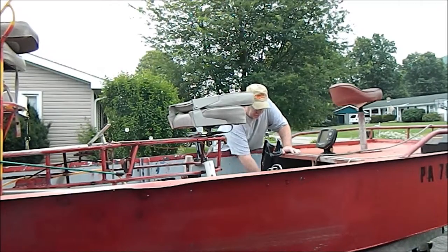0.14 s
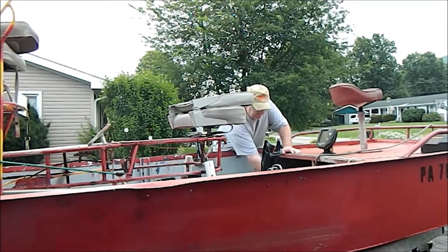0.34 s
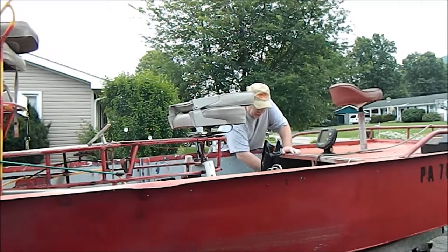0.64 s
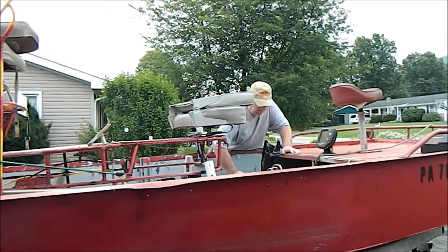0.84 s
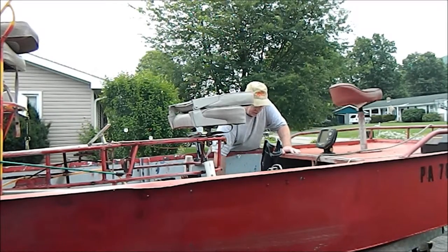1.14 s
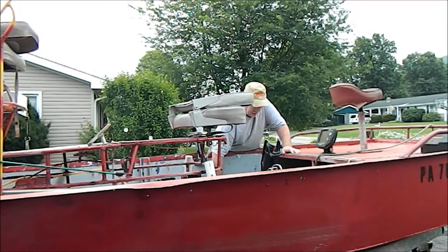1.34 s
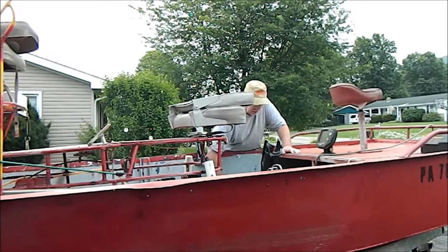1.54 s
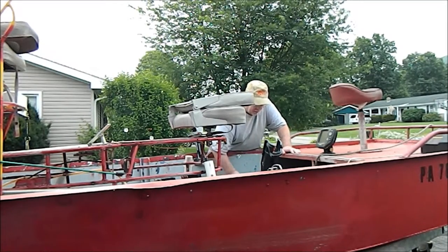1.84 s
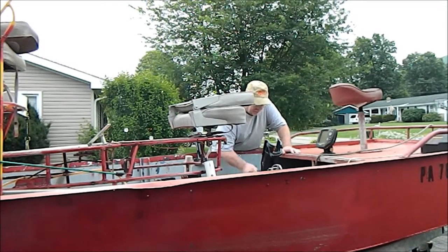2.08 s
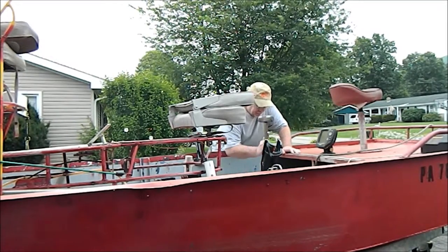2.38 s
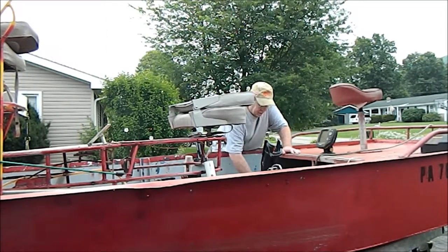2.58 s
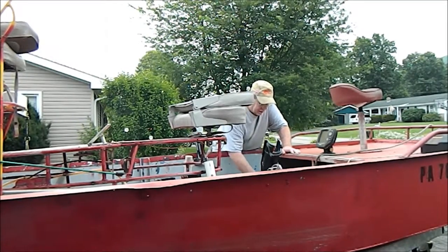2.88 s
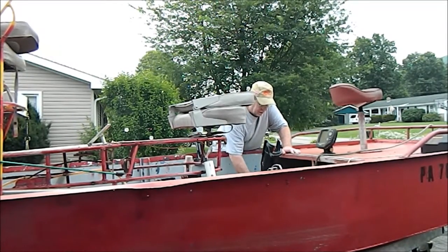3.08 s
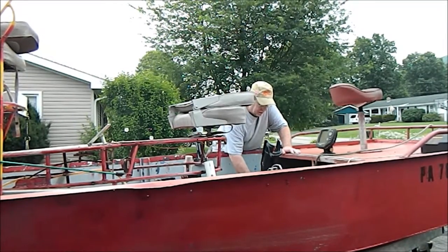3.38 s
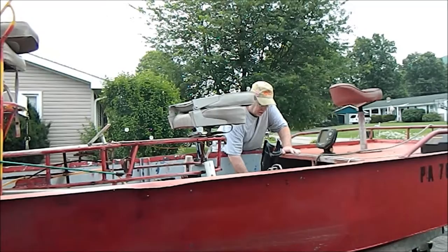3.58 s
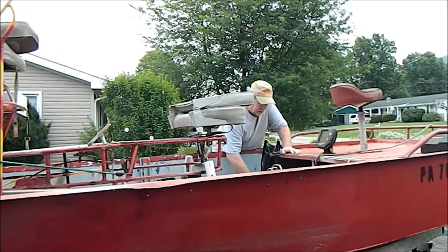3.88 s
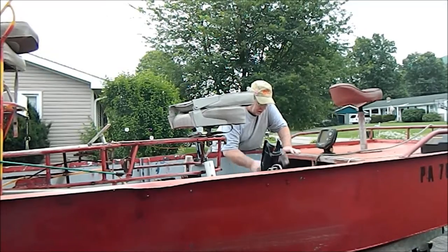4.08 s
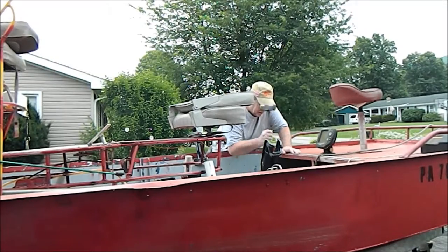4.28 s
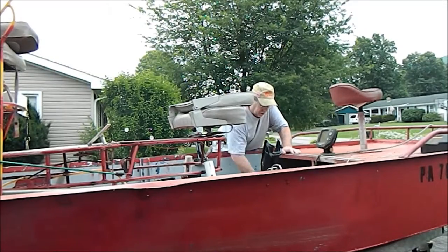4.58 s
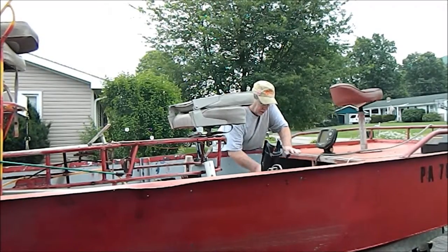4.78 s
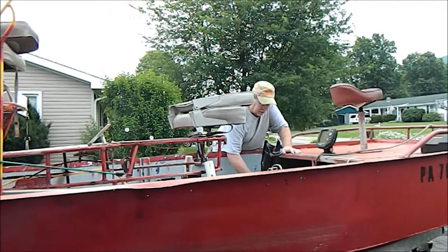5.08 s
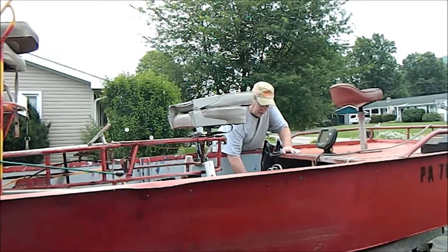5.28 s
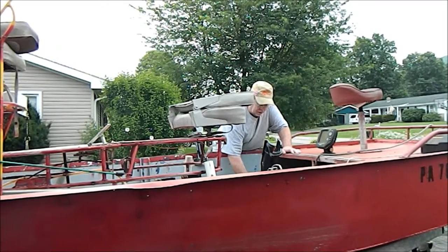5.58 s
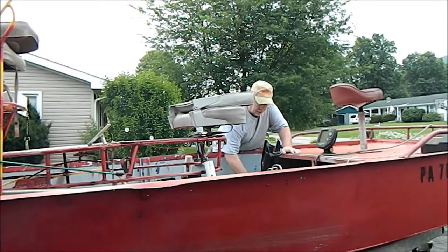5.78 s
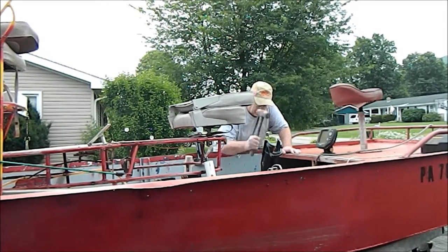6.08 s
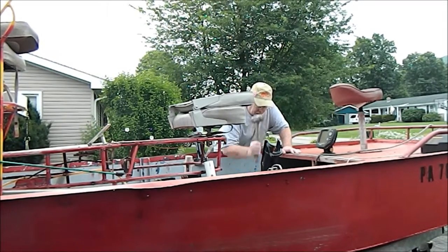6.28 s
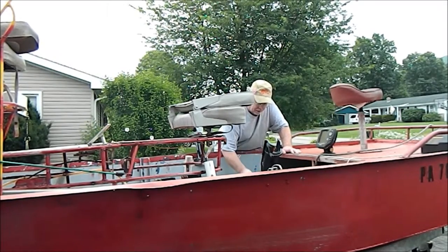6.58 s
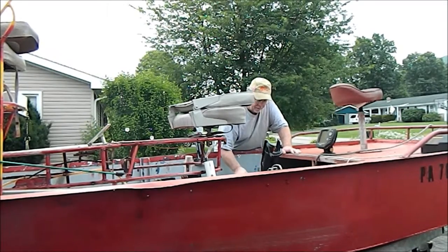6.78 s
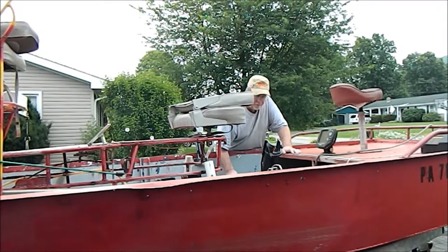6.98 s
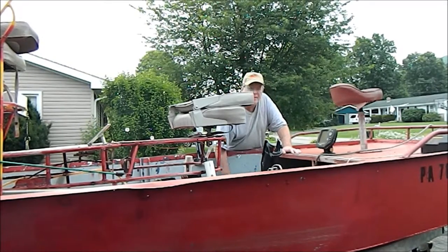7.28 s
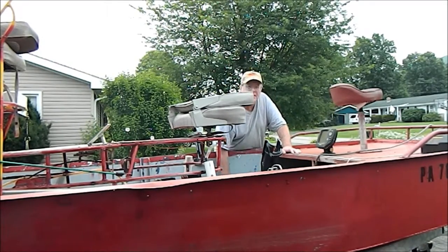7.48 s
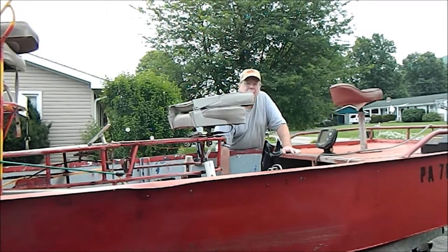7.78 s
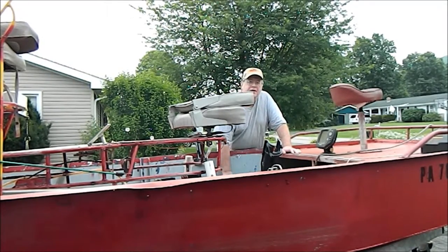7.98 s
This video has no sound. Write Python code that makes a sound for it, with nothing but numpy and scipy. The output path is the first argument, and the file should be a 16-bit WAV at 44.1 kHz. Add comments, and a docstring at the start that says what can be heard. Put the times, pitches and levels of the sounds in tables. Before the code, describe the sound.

Outdoors in a garden, light gusts bump the microphone while a quick chirping bird and a lower whistling bird sing. Weak muffled knocks on a metal hull come first, then loud hollow bangs from about 2.6 seconds, with rapid bounces, small ticks of loose fittings and thin steel ringing. Birdsong mostly stops as the hammering takes over. Stereo microphone a few metres away.

```python
"""A garden with a sheet-metal boat hull a few metres from a stereo pair of microphones.
From the start, gusts bump the microphones over a suburban background, and two songbirds call from the trees.
A hammer soon knocks and bounces on the inside of the hull, to the end: panel modes, dense plate noise and cracks.
From about three seconds loose fittings tick between blows and thin steel tones linger.
The birds are sliding near-sines with echoes; the background is band noise whose level sinks and returns."""
import sys
import numpy as np
from scipy import signal
from scipy.io import wavfile
from scipy.ndimage import uniform_filter1d

SR = 44100
rng = np.random.default_rng(int(sys.argv[2]) if len(sys.argv) > 2 else 0)


def persist_wave(psi):
    """Save psi, clipped to +-1, as 16-bit WAV."""
    counts = np.round(np.clip(psi, -1, 1) * 32767).astype(np.int16)
    wavfile.write(sys.argv[1], SR, np.atleast_2d(counts).T)


N = 358884
STEP = 8  # samples between points of an energy envelope
BANDS_HZ = 45 * 2 ** np.arange(0, 8.6, .5)  # band centres
RISE_S = 0.0036  # part of the rise of the hull that is the same at every pitch
LEFT_RIGHT = np.array([[.5], [-.5]])  # shares out a left-minus-right level difference

# hammer blows and their bounces on the sheet:
# (time [s], level [dB], bass [dB], middle [dB], treble [dB], main panel pitch [Hz])
HAMMER_BLOWS = [(.375, -37, -29, -4, -33, 424), (.743, -14, -32, -17, -39, 390),
                (1.269, -23.5, -27, -28, -29, 360.6), (2.645, -2.5, -21, -14, -18.5, 371),
                (2.671, -18.5, -8, -10, -44, 396.3), (3.124, -13, -15, -11, -15.5, 379.6),
                (3.364, -12.5, -15, -12, -18, 382.3), (3.518, -13.5, -12.5, -12, -21, 382.7),
                (3.601, -15, -17.5, -12.5, -20.5, 381.4), (3.654, -16.5, -16.5, -15.5, -23, 393.4),
                (3.689, -25.5, -16, -16, -26, 376), (4.633, -4, -17, -13.5, -17.5, 380.8),
                (5.302, -25, -15.5, -14.5, -26.5, 379), (5.329, -32.5, -23, -39, -15.5, 420),
                (5.494, -21.5, -17, -10, -18.5, 374.3), (5.518, -25, -17, -25, -20, 399),
                (5.578, -22.5, -16, -12, -23, 376.5), (5.639, -29, -11.5, -14.5, -24.5, 380.7),
                (6.504, -13.5, -19.5, -4, -7, 386), (6.513, -4.5, -14.5, -13, -34, 397.2),
                (7.466, -15, -18, -14.5, -23.5, 384.2), (7.498, -17, -28, -45, -45, 390),
                (7.573, -23.5, -9.5, -18, -38, 419), (7.718, -2, -25.5, -17.5, -33, 399.4),
                (7.792, -10.5, -17, -12, -26, 397.6), (7.812, -7.5, -45, -39, -54, 403),
                (7.859, -16.5, -15, -60, -56, 381), (8.077, -10, -20, -19, -43, 372),
                (8.1, -5.5, -40, -38, -40.5, 373)]


def undb(db):
    """Gain of a level in dB."""
    return np.exp(np.asarray(db) * np.log(10) / 20)


def unit(x):
    """Scale to rms 1."""
    return x / np.sqrt(np.mean(x ** 2))


def spectrum(table, hz):
    """Read (frequency [Hz], value) points on a log frequency axis."""
    points = np.array(table)
    return np.interp(np.log(hz), np.log(points[:, 0]), points[:, 1])


def curve(table, axis):
    """One column of a table over time, at envelope rate."""
    points = np.array(table)
    return np.interp(np.arange(0, N, STEP) / SR, points[:, 0], points[:, axis])


def walk(rate):
    """Random levels held 1 / rate seconds and smoothed twice over that time."""
    hold = int(SR / rate)
    steps = np.repeat(rng.standard_normal(N // hold + 1), hold)
    return 1.36 * uniform_filter1d(uniform_filter1d(steps, hold), hold)[:N]


def add(track, s, x, size=1):
    """Mix x into a track with points size samples apart, from time s."""
    i = int(s * SR / size)
    track[..., i:i + x.shape[-1]] += x[..., :track.shape[-1] - i]


def fade(t60, rise_s, size=1):
    """Rise, then exponential fall down to -60 dB, at points size samples apart."""
    t = np.arange(0, int(t60 * SR), size) / SR
    return (1 - np.exp(-t / max(rise_s, 1e-4))) * undb(-60 * t / t60)


def band_noise(hz):
    """Half-octave stereo noise, as alike and as balanced as the two microphones hear it."""
    # likeness of the two microphones: (frequency [Hz], correlation [0-1])
    likeness = [(60, 0.01), (130, 0.86), (290, 0.88), (640, 0.9), (1410, 0.75), (3100, 0.66), (6820, 0.25),
                (15000, 0.31)]
    # balance of the two microphones: (frequency [Hz], left minus right [dB])
    balance = [(60, -1), (110, -5.5), (200, -0.5), (380, -3), (700, -1), (1290, -0.5), (2380, -0.5),
               (4400, 2), (8120, 3.5), (15000, -1)]
    edges = [hz / 2 ** .25, hz * 2 ** .25]
    band = signal.butter(3, edges, "band", fs=SR, output="sos")
    mid, side = signal.sosfilt(band, rng.standard_normal((2, N)))
    alike = np.clip(spectrum(likeness, hz), 0, 1)
    shared = np.sqrt(1 + alike) * unit(mid)
    opposed = np.sqrt(1 - alike) * unit(side) * np.array([[1], [-1]])
    return (shared + opposed) * undb(spectrum(balance, hz) * LEFT_RIGHT) / np.sqrt(2)


def wind_db(far_db):
    """Wind pressure on the microphones: a breeze that goes with the background, and gusts that swell and fall."""
    # gusts: (time of the peak [s], level [dB], length [s])
    gusts = [(0, -23.5, 0.068), (.13, -25.5, 0.029), (0.197, -35, 0.11), (0.363, -39, 0.12),
             (0.503, -40, .1), (0.604, -30, 0.049), (0.75, -36.5, 0.082), (0.968, -40, 0.047),
             (1.515, -35, 0.11), (1.706, -43.5, 0.23), (2.115, -42.5, 0.066), (2.214, -31.5, 0.063),
             (2.651, -25, 0.067), (3.803, -38.5, 0.23)]
    breeze_db = 1  # over the background level
    t = np.arange(0, N, STEP) / SR
    power = undb(2 * (far_db + breeze_db))
    for s, db, length in gusts:
        power = power + undb(2 * db) * np.exp(-(3 * (t - s) / length) ** 2)
    return 10 * np.log10(power)


def air_power(hz, far_db, leaves_db, gust_db):
    """Energy of distant traffic, high leaf hiss and low wind in one band; each traffic band flickers alone."""
    # distant suburb: (frequency [Hz], relative level [dB per Hz])
    suburb = [(24, -55), (40, -36), (91, -4), (156, -9), (248, -15), (623, -12), (678, -20.5), (890, -20),
              (3270, -26), (6000, -42.5), (7800, -75), (13200, -120)]
    leaf_colour = [(1500, -4), (4000, 2), (8000, -3.5), (12000, -3.5), (16000, -26.5)]
    gust_colour = [(45, -24.5), (110, 1), (200, -19.5), (450, -24.0), (900, -36.0)]
    far_db = far_db + spectrum(suburb, hz) + 10 * np.log10(hz) - 13.0  # level per Hz to level per band
    leaves_db = leaves_db + spectrum(leaf_colour, hz)
    gust_db = gust_db + spectrum(gust_colour, hz)
    traffic = undb(2 * far_db + 3.64 * walk(10)[::STEP])
    return traffic + undb(2 * leaves_db) + undb(2 * gust_db)


def bird(notes, overtone_db):
    """Near sines that bend through three pitches, swell and fade; burr shakes pitch and level."""
    swell_share, fade_share = 0.24, 0.08  # parts of a note
    out, shake = np.zeros(N), walk(180)
    for s, length, start_hz, middle_hz, end_hz, db, burr in notes:
        i = np.arange(int(s * SR), int((s + length) * SR))
        u = np.linspace(-1, 1, len(i))  # start to end of the note
        slide = u * (end_hz - start_hz) / 2
        bend = u ** 2 * ((start_hz + end_hz) / 2 - middle_hz)
        hz = middle_hz + slide + bend
        phase = 2 * np.pi * np.cumsum(hz * (1 + 0.076 * burr * shake[i])) / SR
        swell = np.minimum(np.minimum((1 + u) / swell_share, (1 - u) / fade_share) / 2, 1)
        size = np.sqrt(2) * undb(db) * (1 + 0.17 * burr * shake[i]) * swell
        out[i] += size * (np.sin(phase) + undb(overtone_db) * np.sin(2 * phase))
    return out


def finch_song():
    """Quick chirps, nearly pure, each bent and slightly burred."""
    # chirps: (time [s], length [s], start pitch [Hz], middle pitch [Hz], end pitch [Hz], level [dB])
    chirps = [(0, 0.0089, 2970, 3340, 3940, -36), (0.102, 0.063, 4000, 4200, 4470, -45.5),
              (0.115, 0.028, 3790, 3500, 3000, -43.5), (0.139, 0.029, 3160, 3820, 3910, -35.5),
              (0.227, 0.028, 3970, 3700, 3080, -35.5), (0.269, 0.023, 5150, 5160, 5100, -47),
              (.29, 0.022, 5240, 4600, 4000, -33), (0.428, 0.029, 2870, 3290, 3520, -31.5),
              (0.502, 0.013, 3950, 4250, 4530, -48), (0.507, 0.026, 4100, 3830, 3060, -33.5),
              (0.599, .03, 2960, 3340, 3820, -43.5), (0.62, 0.019, 3800, 3900, 3850, -37.5),
              (0.609, .022, 2610, 3300, 4300, -39), (0.713, 0.044, 5100, 5020, 5140, -44.5),
              (0.723, 0.046, 4750, 4240, 4520, -41.5), (0.747, 0.022, 5130, 4500, 3800, -35),
              (.817, 0.032, 4170, 3690, 2840, -32.5), (0.847, 0.057, 2900, 3860, 3880, -42),
              (0.957, 0.045, 2760, 3020, 2300, -35.5), (1.018, 0.028, 2350, 3660, 2500, -37),
              (1.122, 0.028, 3000, 2485, 3600, -38), (1.16, 0.03, 3720, 3500, 2300, -36.5),
              (1.237, 0.018, 3800, 4500, 5500, -42), (1.242, 0.027, 3200, 3830, 3730, -42),
              (1.257, 0.014, 5700, 4600, 3530, -40), (1.447, 0.074, 3400, 3490, 3490, -46.5),
              (1.97, 0.034, 4840, 4210, 3150, -53), (2.012, 0.072, 3170, 3810, 4180, -45.5),
              (2.032, 0.039, 7000, 6300, 5900, -52.5), (2.064, 0.015, 4250, 3380, 2900, -38),
              (2.068, .035, 7050, 7030, 6260, -53), (2.076, 0.047, 4200, 4230, 4260, -49),
              (2.078, 0.029, 2960, 2850, 2770, -38.5), (2.183, 0.042, 3330, 3250, 3290, -42.5),
              (2.228, .022, 3700, 4870, 5700, -51), (2.315, .03, 4750, 4200, 3700, -58),
              (2.342, 0.013, 3700, 5030, 6250, -50), (2.4, 0.053, 3680, 3770, 3420, -56),
              (2.466, 0.026, 2950, 3710, 4650, -39), (2.478, 0.037, 4380, 5170, 4830, -47),
              (2.487, 0.028, 4900, 4520, 3540, -39), (2.513, 0.016, 3500, 3560, 3550, -35.5),
              (2.527, 0.038, 3200, 3500, 3870, -35), (2.563, .035, 3730, 3760, 3700, -44.5),
              (2.566, 0.044, 3100, 3190, 3300, -44)]
    burr = .15
    return bird([(*row, burr) for row in chirps], overtone_db=-35)


def trill():
    """A whistle whose pitch swings evenly up and down, at the end of one thrush phrase."""
    start_s, length_s, level_db = 1.74, 0.078, -30
    middle_hz, swing_hz, period_s = 2290, 280, .025
    out, t = np.zeros(N), np.arange(int(length_s * SR)) / SR
    hz = middle_hz + swing_hz * np.cos(2 * np.pi * (t + 0.0074) / period_s)
    whistle = np.sin(2 * np.pi * np.cumsum(hz) / SR)
    add(out, start_s, np.sqrt(2) * undb(level_db) * signal.windows.tukey(len(t), .3) * whistle)
    return out


def thrush_song():
    """Mostly lower whistled notes, each bent and burred in its own way, with one trill."""
    # notes: (time [s], length [s], start pitch [Hz], middle pitch [Hz], end pitch [Hz], level [dB],
    # burr [relative, 0-3])
    whistles = [(0, 0.013, 2470, 2415, 2340, -32, 0.68), (.25, 0.036, 2310, 2197, 2140, -45.5, .25),
                (.287, 0.041, 3260, 3206, 3180, -30.5, 0.27), (.327, 0.045, 2190, 2190, 1974, -33, 0.15),
                (.377, 0.042, 2420, 2670, 2870, -30, 0.12), (.422, 0.043, 2330, 2460, 2620, -31.5, .2),
                (.464, 0.039, 2126, 2400, 2430, -33.5, .25), (.79, 0.081, 2430, 2372, 2374, -25.5, 0.067),
                (.872, 0.016, 2270, 2116, 1840, -29.5, 0.34), (.886, 0.058, 1840, 1898, 2030, -34.5, .25),
                (.94, 0.069, 2300, 2226, 2087, -29, 0.087), (.9, 0.14, 4670, 4500, 4410, -51, .85),
                (1.237, 0.031, 1960, 2216, 2170, -40.5, 0.17), (1.27, 0.04, 3250, 3115, 2670, -25.5, 0.36),
                (1.314, .038, 2550, 2500, 2380, -28, 0.6), (1.354, 0.0287, 2180, 2183, 2150, -24.5, 0.14),
                (1.6, 0.092, 2517, 2643, 2750, -33.5, 0.31), (1.662, 0.026, 2810, 2980, 2880, -25.5, 0.46),
                (1.687, 0.045, 2780, 2413, 2480, -24.5, 0.15), (2.11, 0.092, 2900, 2450, 2660, -46, 2.45),
                (4.39, 0.093, 2620, 2815, 2830, -51.5, 0.091), (4.48, 0.1, 3270, 3070, 3030, -55, .45),
                (4.497, 0.054, 2710, 2480, 2400, -50.5, .2), (4.545, .07, 2420, 2700, 2720, -46, 0.21)]
    return bird(whistles, overtone_db=-40.5) + trill()


def garden(x, wet_db, t60):
    """A few clear wall echoes with a scattered tail from the trees, unlike left and right."""
    # house walls: (delay [s], left level [dB], right level [dB])
    wall_echoes = [(.009, -9.5, -5.5), (0.018, -13.5, -8.5), (.031, -19, -19)]
    tail = rng.standard_normal((2, int(t60 * SR))) * fade(t60, 0.004)
    tail = undb(wet_db) * tail / np.sqrt(np.sum(tail[0] ** 2))
    for s, left_db, right_db in wall_echoes:
        add(tail, s, undb([[left_db], [right_db]]))
    return signal.fftconvolve(x[None], tail, axes=1)[:, :N]


def fittings_power(hz):
    """Energy of loose fittings in one band: short ticks of small parts, which radiate little bass."""
    # ticks: (time [s], level [dB], darkness above 2500 Hz [dB per octave])
    fitting_ticks = [(2.879, -28, -0.5), (3.8177, -36.5, -4), (3.8971, -44.5, 3.5), (4.0326, -43.5, 2.5),
                     (4.1969, -49, 5.5), (4.3789, -46.5, 5), (4.9314, -46.5, 3), (4.9856, -38.5, -1.5),
                     (5.0753, -34.5, 3), (5.166, -31, -1), (5.6994, -52, -5), (5.7465, -50, 1),
                     (5.833, -50, 4), (5.8696, -47.5, 5), (5.916, -44.5, 2), (5.996, -44, 3),
                     (6.0294, -49, 10), (6.0811, -43.5, 3.5), (6.1737, -43, 2), (6.2163, -47, 4),
                     (6.28, -43.5, 1), (6.399, -42.5, 2.5), (6.452, -42, 6), (6.7574, -43, 6),
                     (6.808, -40.5, 1), (6.9274, -51.5, 3)]
    power = np.zeros((2, len(range(0, N, STEP))))
    small = hz ** 2 / (hz ** 2 + 1500 ** 2) / (1 + (hz / 11000) ** 4)
    shape = small * fade(0.17, 0.0025, size=STEP)
    for s, db, dark_db in fitting_ticks:
        colour_db = -10.5 - dark_db * np.log2(max(hz, 2500) / 5000)
        add(power, s, (undb(db + colour_db) * shape) ** 2, size=STEP)
    return power


def rings():
    """Thin steel tones of hammer head and rails that outlast a blow and waver in level."""
    # lone modes: (time [s], frequency [Hz], level [dB], fall by 60 dB [s])
    steel_modes = [(2.88, 2300, -54, 1.2), (3.52, 9690, -54, .6), (4.64, 2320, -56, 2.2),
                   (5.5, 9690, -51, .9), (5.5, 680, -57, 5), (6.51, 2080, -62, 4), (6.51, 675, -60, 4),
                   (7.48, 9690, -57, .6)]
    out = np.zeros(N)
    for s, hz, db, t60 in steel_modes:
        shape = fade(t60, .004)
        add(out, s, undb(db) * shape * np.sin(2 * np.pi * hz * np.arange(len(shape)) / SR))
    return out * undb(3.2 * walk(40))


def plate_power(hz):
    """Energy of the sheet in one band: too many modes to tell apart, fed by every blow."""
    # dense plate vibration: (frequency [Hz], fall by 60 dB [s])
    plate_fall = [(60, 0.84), (200, 0.49), (400, 0.53), (1000, 0.29), (2500, 0.33), (6000, 0.39),
                  (12000, 0.54)]
    power = np.zeros((2, len(range(0, N, STEP))))
    # steel on steel: a short bright edge
    edge = min(hz / 9000, 1.6) * fade(0.021, 0.0016, size=STEP)
    # the struck spot sheds its treble first
    clang = undb(5.5) * min(hz / 2500, 1) * fade(0.19, 0.0046, size=STEP)
    # long waves build up late
    body = fade(spectrum(plate_fall, hz), RISE_S + 1.9 / hz, size=STEP)
    pan_db = 0.5  # left minus right
    for s, db, bass_db, mid_db, high_db, _ in HAMMER_BLOWS:
        # top level and crack are set from the blow's level plus its treble
        top_db = high_db + 8 + 1.4 * (db + high_db)
        crack = undb(40.5 + 0.93 * (db + high_db)) * edge
        colour_db = spectrum([(45, bass_db - 29.5), (110, bass_db - 7), (400, -16.5),
                              (1500, mid_db - 7.5), (7000, high_db - 7.5), (14000, top_db + 2.5)], hz)
        gain = undb(db + colour_db + pan_db * LEFT_RIGHT)
        for layer in (body, crack, clang):
            add(power, s, (gain * layer) ** 2, size=STEP)
    return power


def metal_power(hz, chatter_db):
    """Energy of sheet and fittings in one band; loose seams chatter as it shakes, most in the treble."""
    return (plate_power(hz) + fittings_power(hz)) * undb(2 * chatter_db * min(hz / 1500, 1))


def hull():
    """The panel modes; each blow lands elsewhere, so it shifts and weighs them afresh."""
    # modes of the panels before each blow retunes them: (frequency [Hz], relative level [dB], fall by 60 dB [s])
    panel_modes = [(92.3, 0, 0.2), (109.3, 3.5, 0.11), (181.3, -16.5, 0.85), (248, -11.5, .3),
                   (310.4, -14.5, 0.13), (361.4, -7.5, 0.41), (393.4, 0.5, 0.26), (476, -4.5, 0.23),
                   (530.4, -6.5, 0.12), (623.5, -12, 0.17), (672.4, -14.5, .35), (788, -42, 0.15),
                   (888, -17.5, .35), (961, -19.5, .3), (1057, -24.5, 0.54), (1182, -17, 0.19),
                   (1350, -24, 0.44), (1606, -32, 0.7), (1726, -29, 0.61), (1954, -20.5, 0.32),
                   (2090, -28, 0.51), (2430, -26.5, 0.28), (2870, -25, 0.15), (3010, -29.5, 0.16),
                   (3180, -31, 0.42)]
    panel_db, pan_db = -6, -2.5  # overall level; left minus right
    reference_hz = 382  # main panel pitch to which the modes are tuned
    out = np.zeros((2, N))
    chance = rng.standard_normal((len(HAMMER_BLOWS), len(panel_modes), 3))
    for (s, db, bass_db, mid_db, _, main_hz), luck in zip(HAMMER_BLOWS, chance):
        blow_colour = [(110, bass_db + 11.5), (400, 0.015), (1500, mid_db + 13)]
        for (hz, mode_db, t60), (detune, weight, turn) in zip(panel_modes, luck):
            shape = fade(t60, RISE_S + 0.84 / hz)
            mode_hz = hz * main_hz / reference_hz * (1 + .008 * detune)
            tone = np.sin(2 * np.pi * mode_hz * np.arange(len(shape)) / SR + 2 * turn)
            level_db = db + panel_db + mode_db + spectrum(blow_colour, hz) + 2.8 * weight
            add(out, s, undb(level_db + pan_db * LEFT_RIGHT) * (shape * tone))
    return out


def scene():
    """Air, birds and metal at two microphones."""
    # background: (time [s], far level [dB], leaf hiss [dB]), both before colouring
    background = [(0, -56, -59), (1, -53.5, -60), (2.6, -55, -59.5), (2.9, -58, -66), (3.9, -61, -63),
                  (4.25, -61, -79.5), (4.6, -52.5, -54.5), (4.9, -61.5, -67.5), (5.3, -67, -72),
                  (5.85, -67, -81), (6.45, -58.5, -68), (6.9, -57.5, -68), (7.1, -69.5, -99),
                  (7.45, -69, -75), (8.14, -54, -72)]
    far_db, leaves_db = curve(background, axis=1), curve(background, axis=2)
    gust_db = wind_db(far_db)
    finch, thrush = finch_song(), thrush_song()
    # finch to the left, thrush to the right
    direct = finch * undb([[1.2], [-1.2]]) + thrush * undb([[-.6], [.6]])
    birds = direct + garden(finch + thrush, wet_db=-4.5, t60=0.27)
    chatter_db = 1.5 * walk(150)[::STEP]
    out = birds + rings() + hull()
    for hz in BANDS_HZ:
        power = air_power(hz, far_db, leaves_db, gust_db) + metal_power(hz, chatter_db)
        envelope = [np.interp(np.arange(N) / STEP, np.arange(len(ear)), ear) for ear in np.sqrt(power)]
        out = out + band_noise(hz) * envelope
    return out


def record(dry):
    """The microphone channel rounds the loudest peaks, then a steep low-pass cuts the top."""
    rounded = np.tanh(.6 * dry) / .6
    low_pass = signal.ellip(10, .2, 80, 15550, fs=SR, output="sos")  # edge in Hz
    return signal.sosfilt(low_pass, rounded)


dry = scene()
out = record(dry)
persist_wave(out)
```